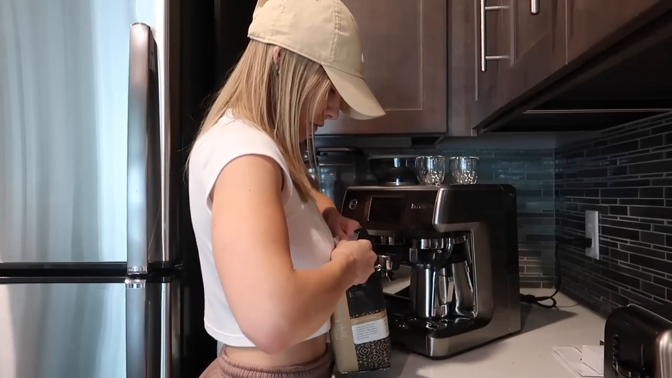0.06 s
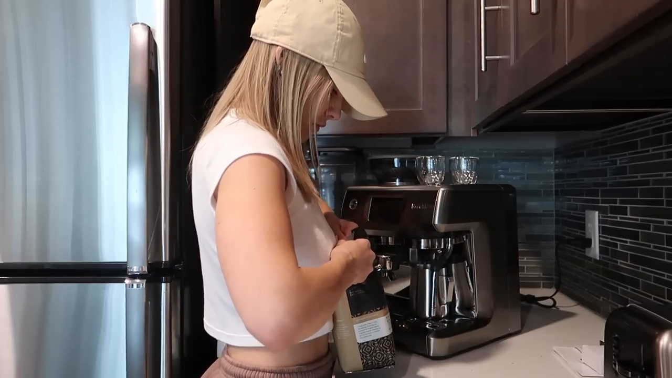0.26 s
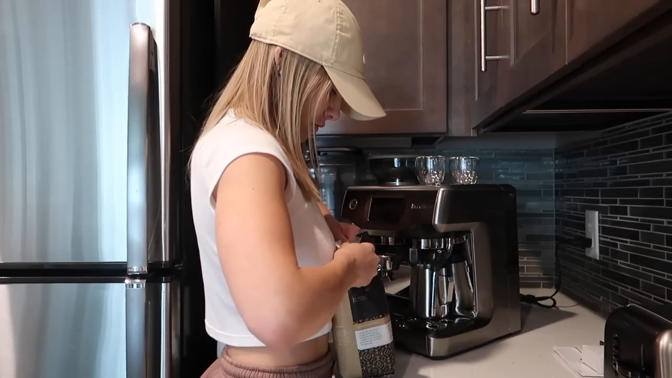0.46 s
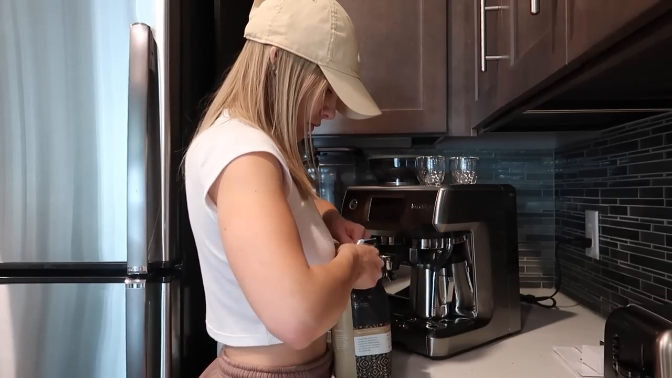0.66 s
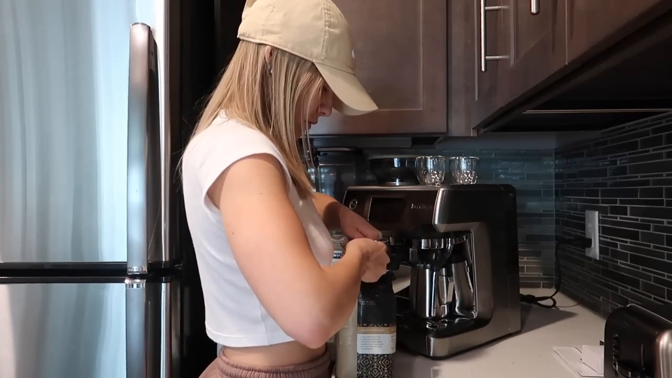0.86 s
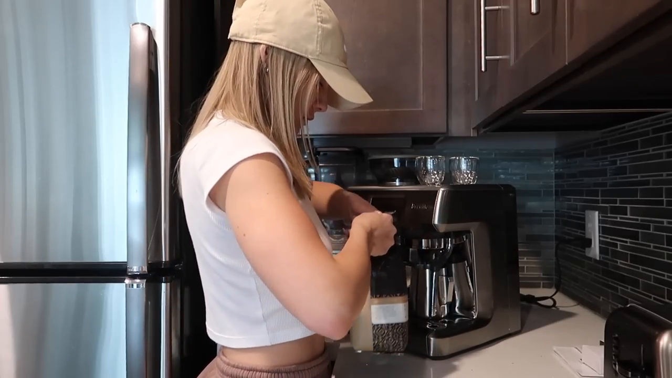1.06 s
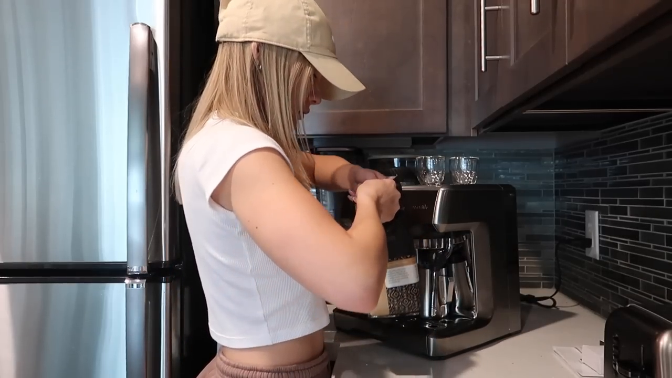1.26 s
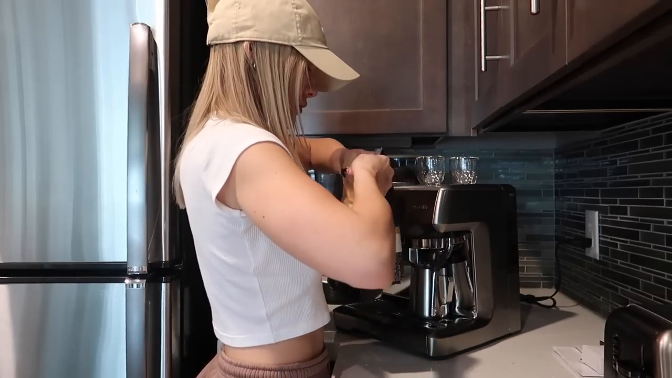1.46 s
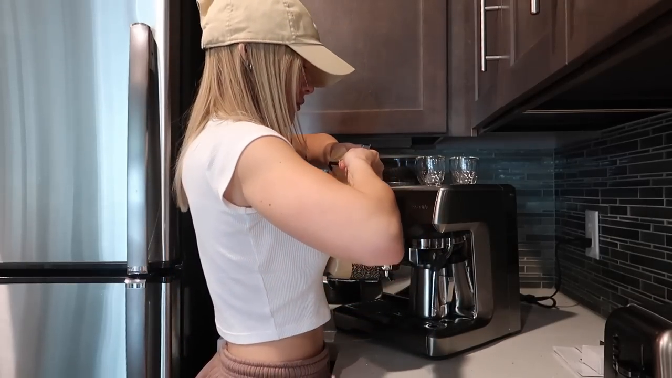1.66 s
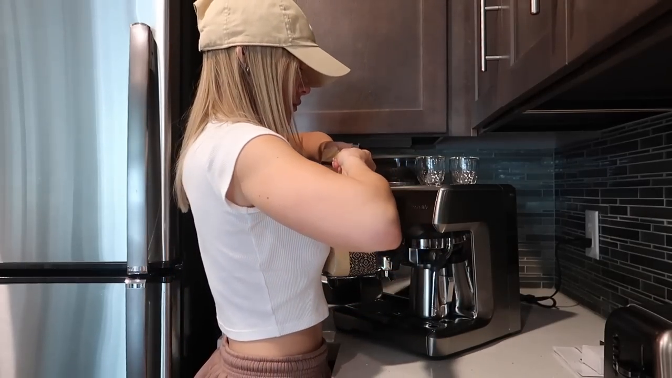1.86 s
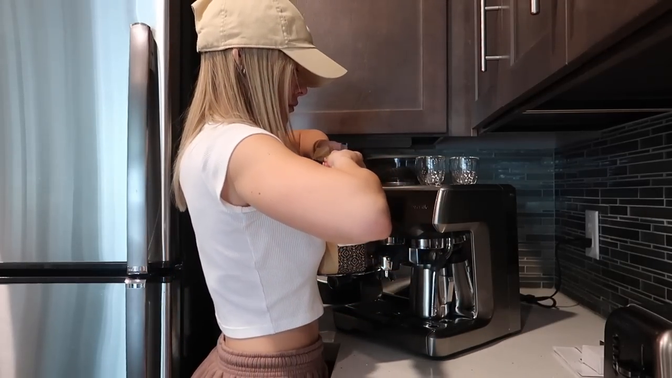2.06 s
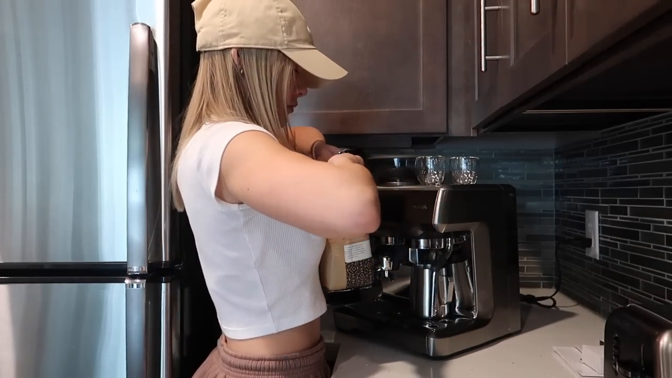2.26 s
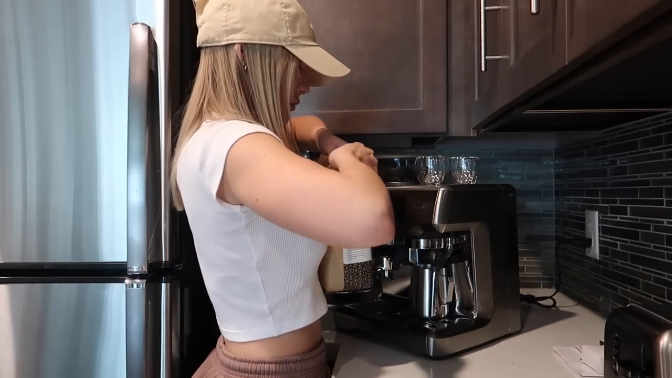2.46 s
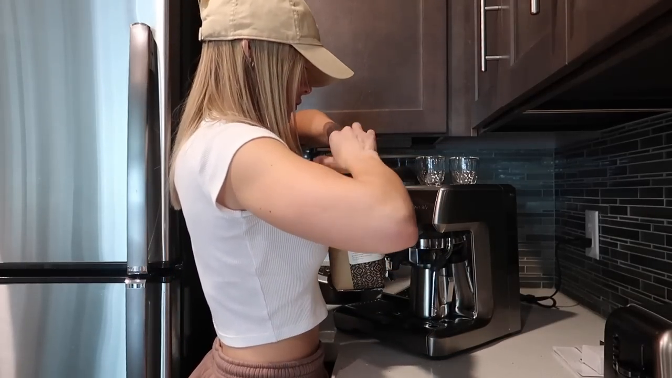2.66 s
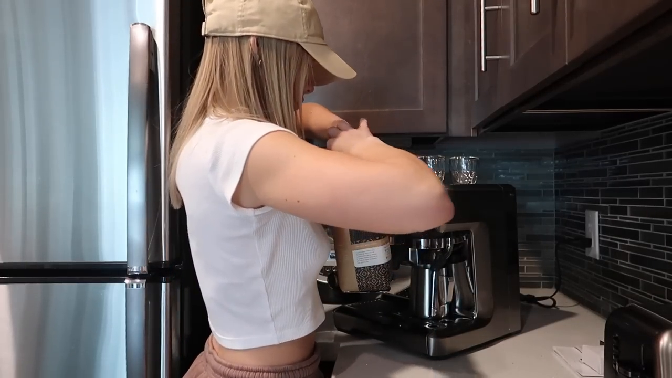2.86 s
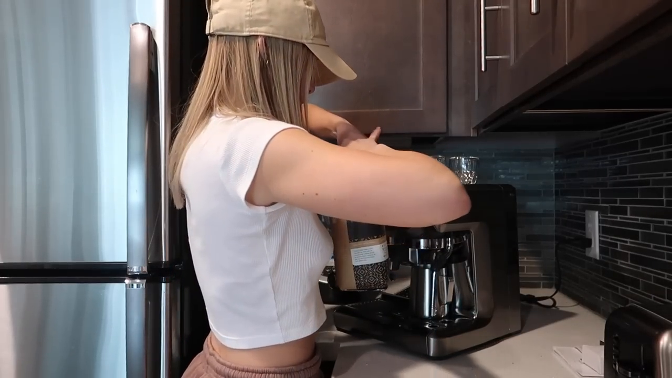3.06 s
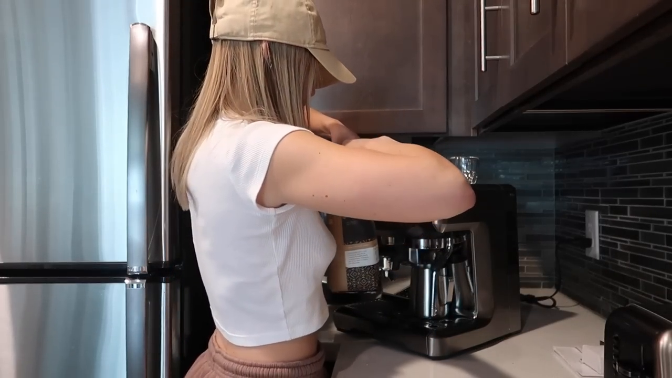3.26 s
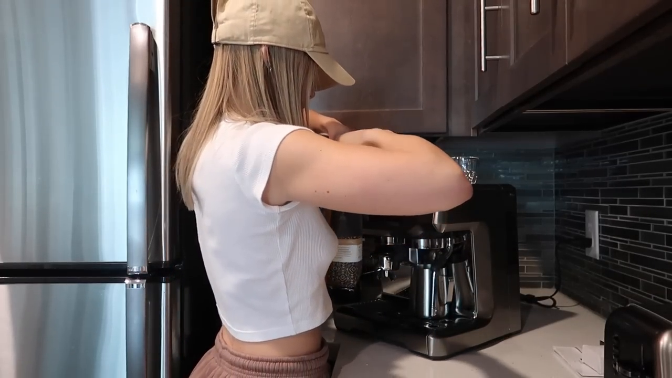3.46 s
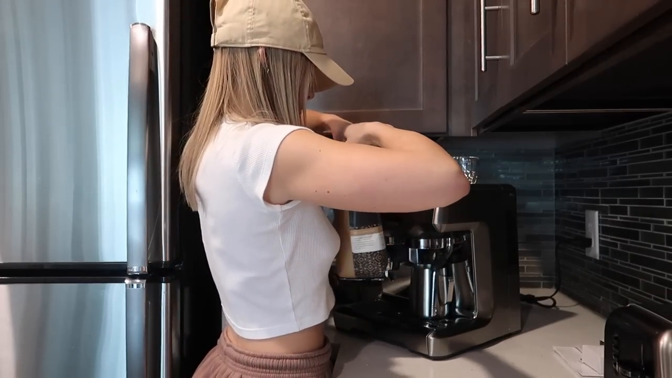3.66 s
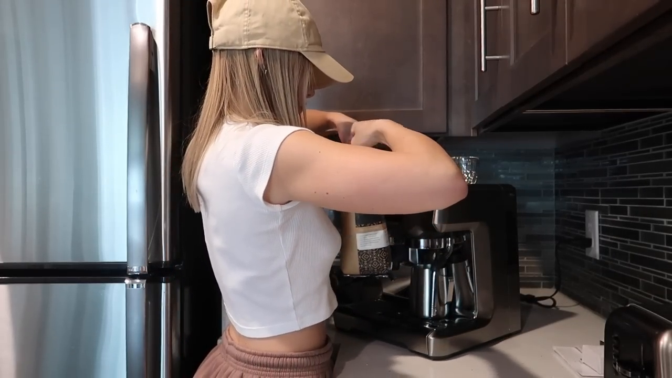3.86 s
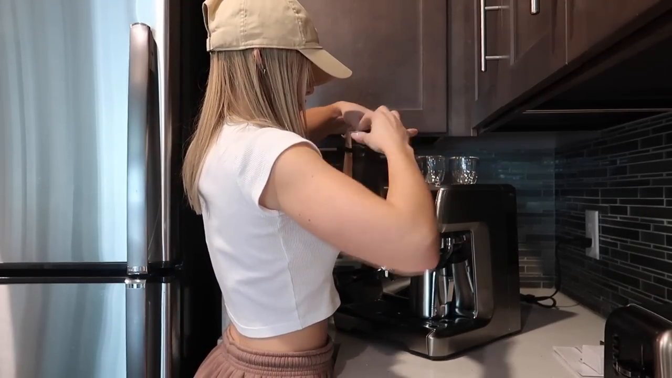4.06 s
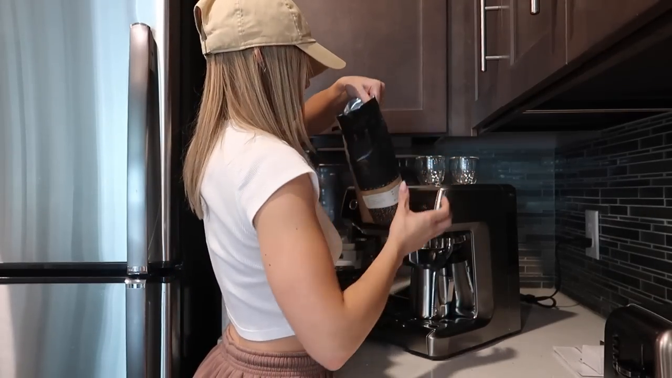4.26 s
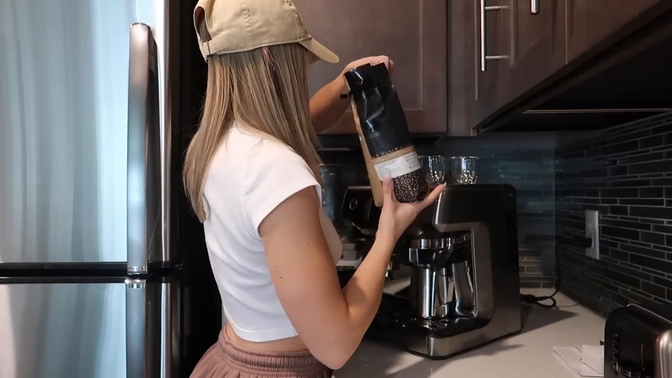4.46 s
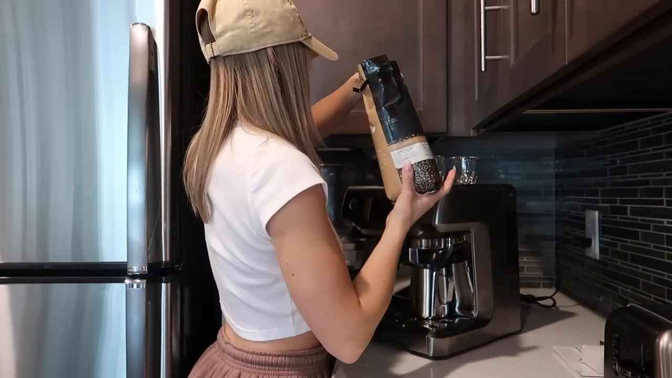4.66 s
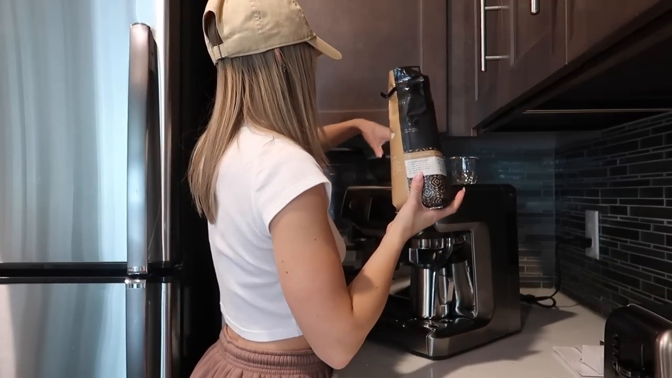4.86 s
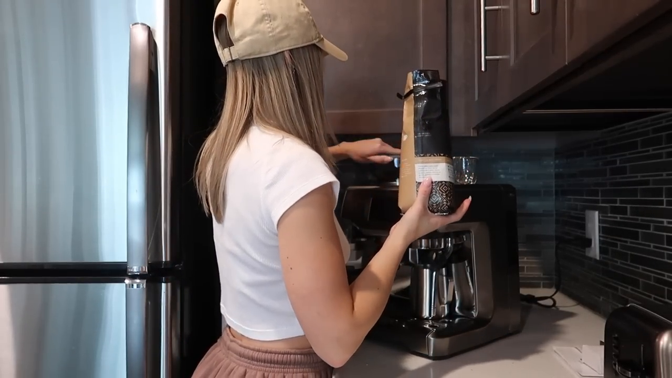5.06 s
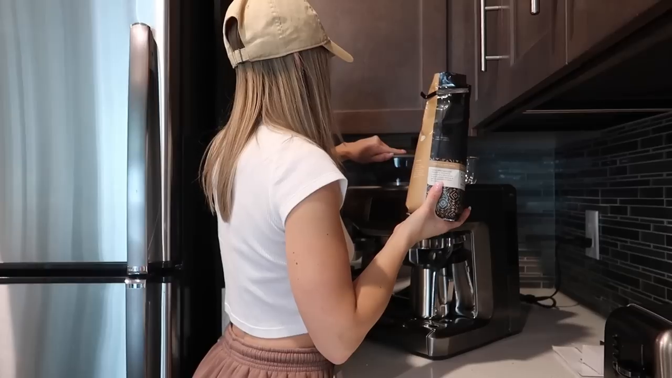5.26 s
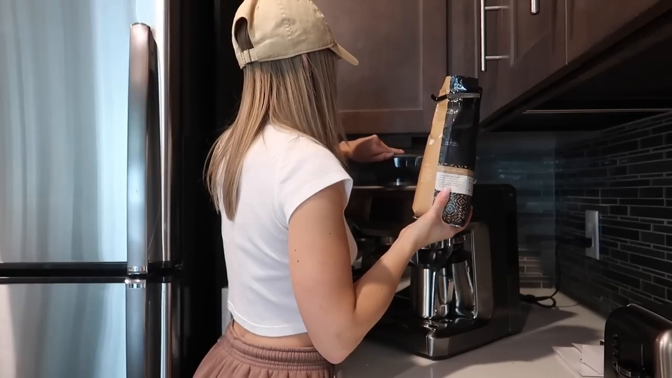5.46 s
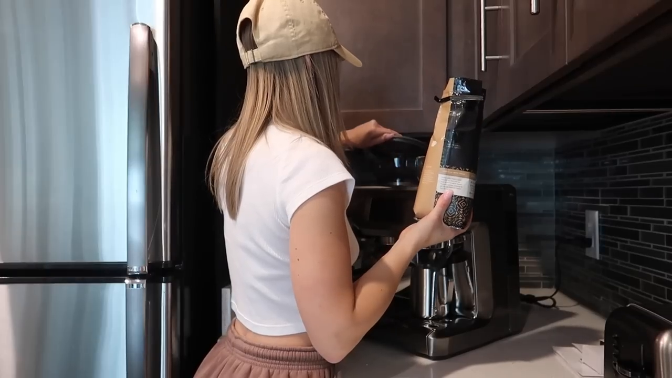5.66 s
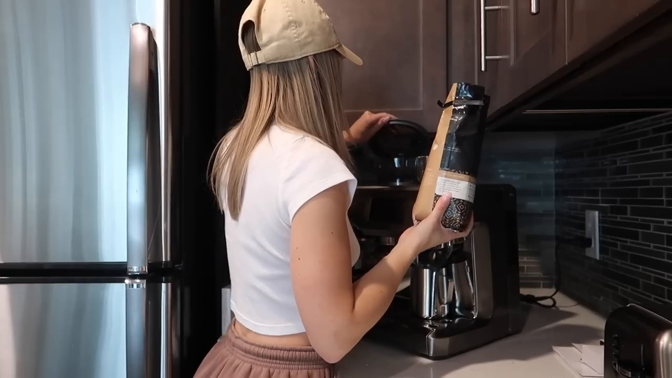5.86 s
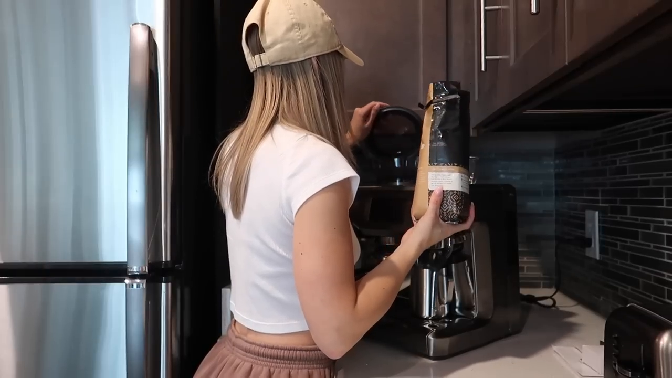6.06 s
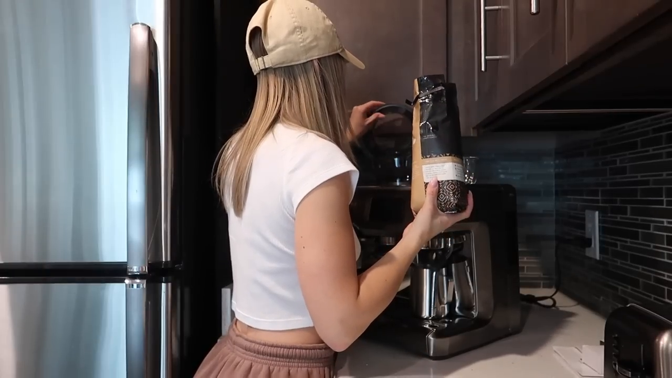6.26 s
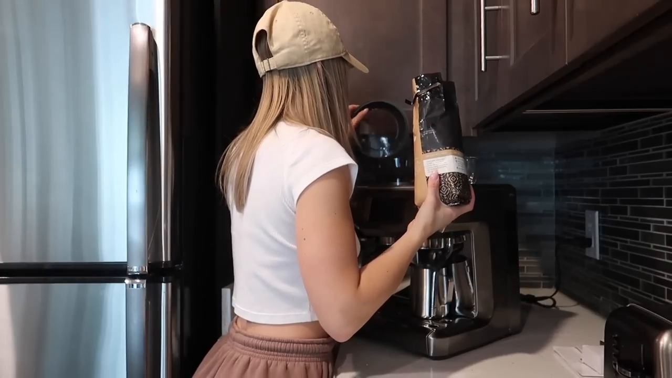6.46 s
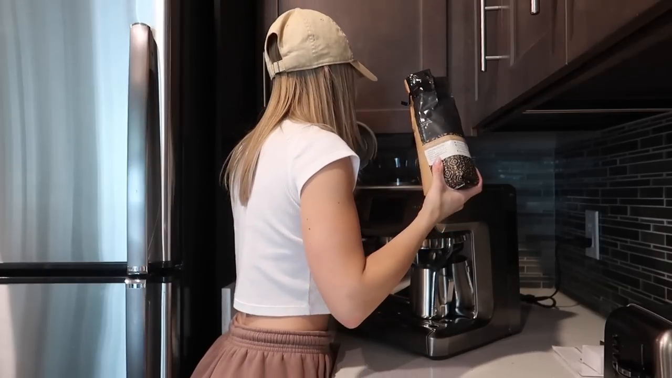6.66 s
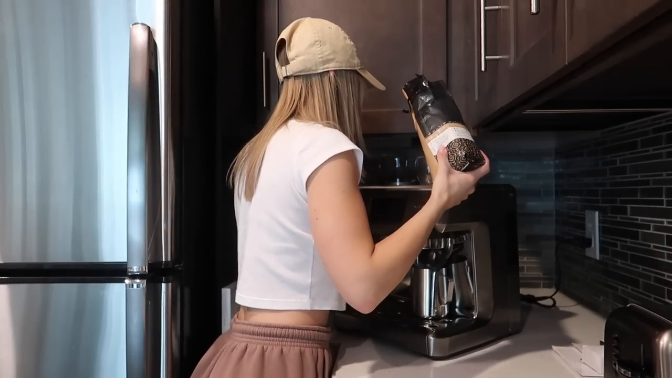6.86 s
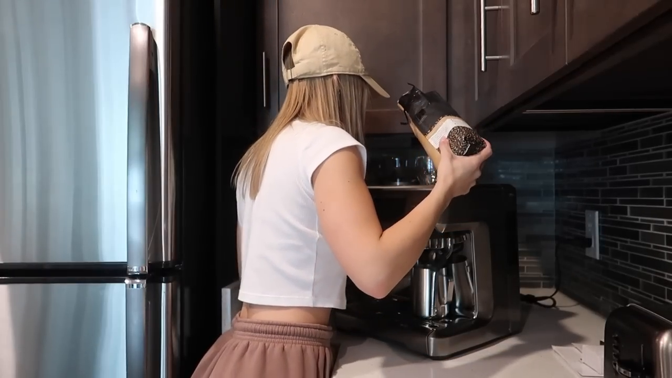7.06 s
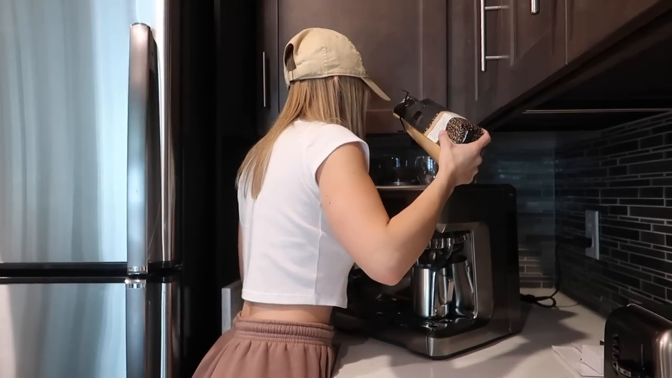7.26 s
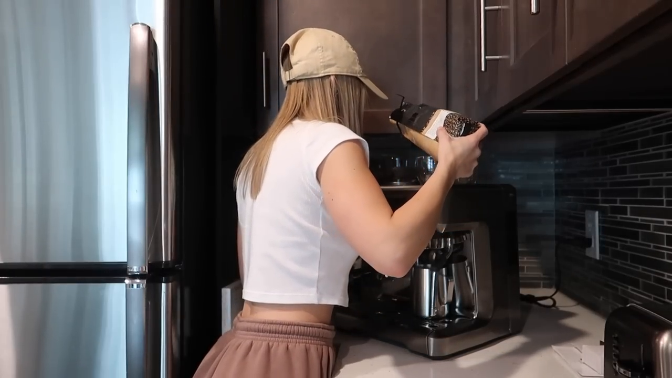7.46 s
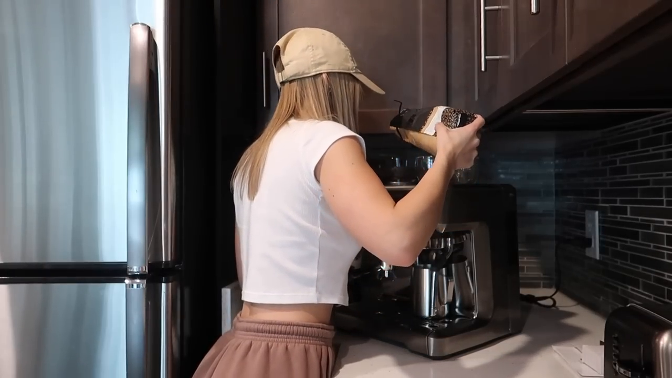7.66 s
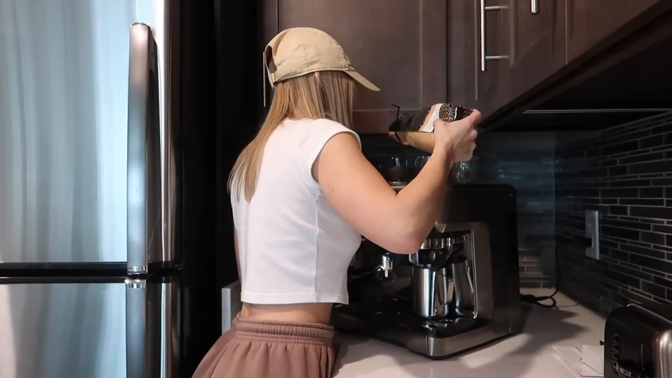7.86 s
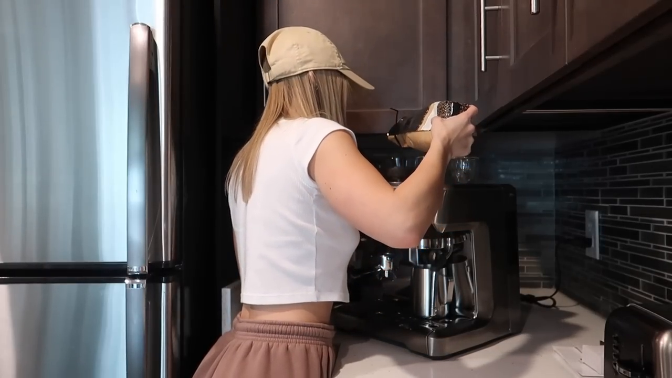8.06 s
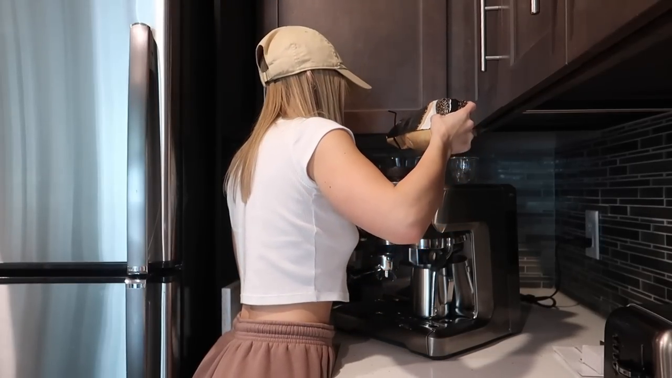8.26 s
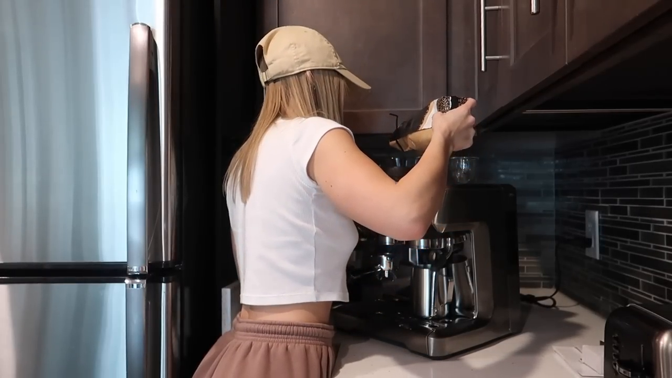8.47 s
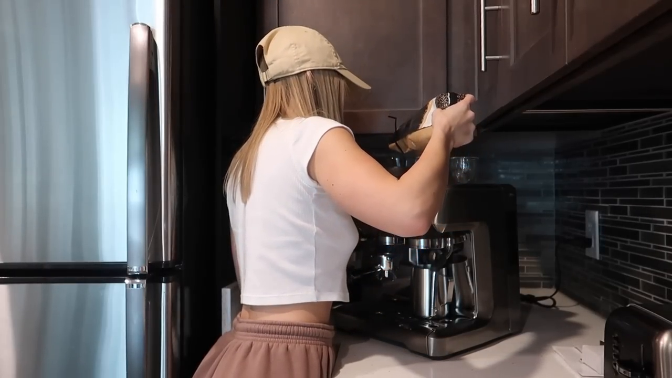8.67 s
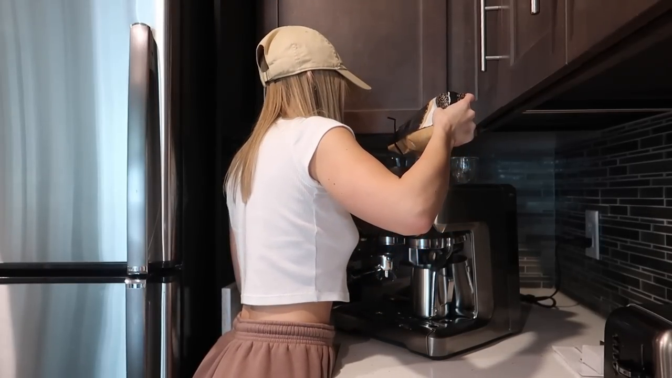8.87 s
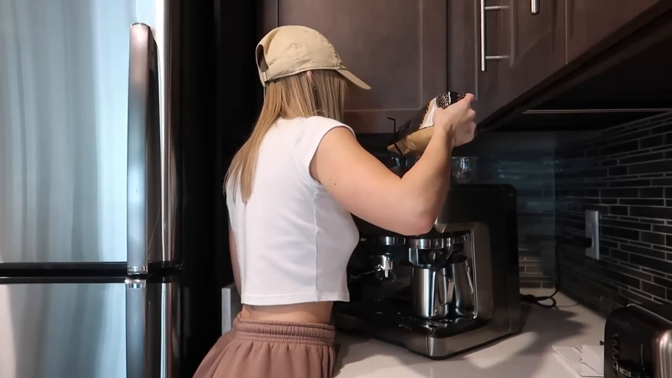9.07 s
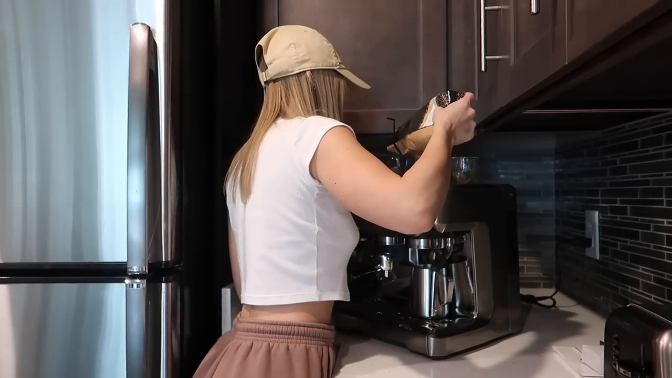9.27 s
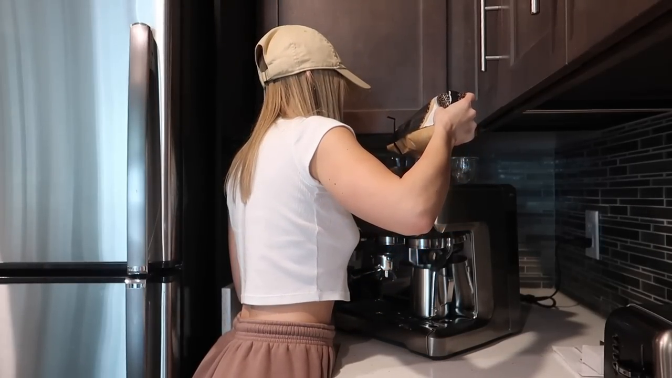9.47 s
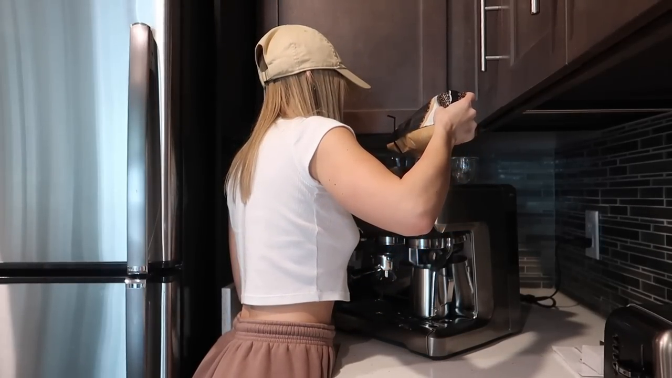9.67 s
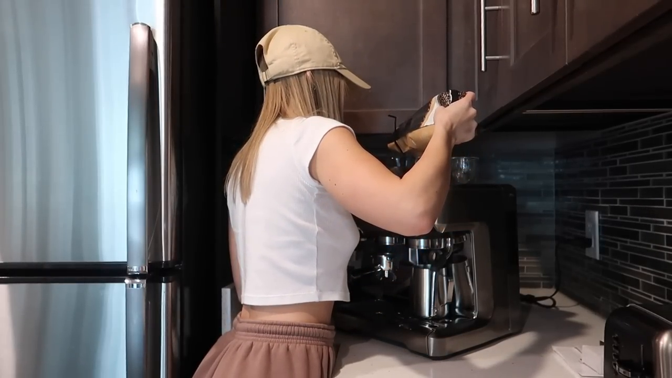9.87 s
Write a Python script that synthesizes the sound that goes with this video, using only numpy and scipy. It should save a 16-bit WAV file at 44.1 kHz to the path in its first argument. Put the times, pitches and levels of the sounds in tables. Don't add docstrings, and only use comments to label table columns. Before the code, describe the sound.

Close stereo sound of a coffee bag being opened and emptied indoors. Foil and paper pop sharply with short, lively room echo and padded counter bumps, loudest around the seal tearing. The handling dies away to low fridge hum and faint touches. Then beans shift with hollow rushes in the tipped bag, tick one by one, and pour with a hard, bright clatter that continues to the end.

```python
import sys
import numpy as np
from scipy import signal
from scipy.fft import rfft, irfft, next_fast_len
from scipy.io import wavfile
from scipy.ndimage import map_coordinates

SR = 44100
rng = np.random.default_rng(int(sys.argv[2]) if len(sys.argv) > 2 else 0)


def to_wav(sig):
    pcm = np.clip(np.atleast_2d(sig), -1, 1) * 32767
    pcm = np.round(pcm).astype(np.int16)
    wavfile.write(sys.argv[1], SR, pcm.T)


def boost(x):
    u = np.asarray(x, float) / 20
    return 10 ** u


N = 437031

# frequency in Hz, strength in dB per Hz.
AIR_COLOUR = [(12, -42), (20, -25), (85, -15.5), (161, -11), (191, -10), (306, -5.5), (597, -19),
              (767, -19.5), (1010, -25), (2920, -32), (11700, -50.5), (15500, -57)]
# time in seconds, level in dB.
AIR_LEVEL = [
    (0.0, -47),
    (1.35, -42.5),
    (9.91, -44),
]
# frequency in Hz, level in dB.
NEAR_SIDE = [(60, -24), (110, -24), (200, -31), (380, -44), (700, -26), (1290, -27), (2380, -21),
             (4400, -5.5), (8120, 2), (15000, 6)]
AIR_SIDE = [(60, -29), (110, -8), (200, -14), (380, -11), (700, -7.5), (1290, -5), (2380, -5.5), (4400, -3),
            (8120, 0), (15000, 3)]
SHAFT_HZ = 28.5
# multiple, level in dB rms.
SHAFT_MULTIPLES = [(2, -65.5), (6, -59.5), (8, -59), (9, -54.5), (10, -59.5), (11, -50), (12, -55),
                   (13, -56), (14, -65.5), (15, -85), (16, -73)]
# frequency in Hz, level in dB rms, wander in Hz.
LOOSE_TONES = [
    (30.2, -55.5, 5.66),
    (116.4, -59, 1.93),
    (158.3, -51.5, 1.93),
    (1970, -84, 4),
    (2830, -70, 5.06),
]
# frequency in Hz, time to fall 60 dB in seconds.
KITCHEN_DECAY = [(250, 0.33), (2000, 0.59), (10000, 0.43)]

# time in seconds, peak in dB, pitch in Hz, 60 dB decay in seconds.
KNOCKS = [(1.156, -30, 236, .09), (1.339, -30.5, 250, .09), (2.627, -29, 183, .09),
          (2.823, -33.5, 183, .09), (2.95, -27, 194, .08), (3.115, -31, 165, .07), (3.601, -29, 232, .09),
          (5.595, -33, 111, .09), (1.084, -26, 780, .05), (1.926, -28, 520, .08), (2.2, -19, 560, .07),
          (2.834, -23, 620, .045), (2.949, -20, 520, .05)]
# time in seconds, peak in dB, pitch in Hz, 60 dB decay in seconds.
TAPS = [
    (1.159, -32, 1600, .2),
    (3.906, -24, 845, .07),
    (4.034, -27, 900, .08),
    (4.848, -42, 1376, .14),
    (2.948, -24, 4250, .035),
    (3.467, -21, 850, .08),
]

# frequency in Hz, strength in dB per Hz.
HEAP_COLOUR = [(260, -48), (450, -3), (767, 3), (916, 9), (1000, 5.5), (1680, 2), (2580, 2.5), (2820, 2),
               (15500, -46)]
# frequency in Hz, strength in dB per Hz.
BEAN_COLOUR = [(260, -49), (450, -17.5), (2400, -11), (2870, -5.5), (3270, -6.5), (4530, -10), (4740, -10),
               (11500, -17.5), (13400, -26.5), (15700, -41)]
# frequency in Hz, width in Hz, level in dB.
BAG_TONES = [
    [(845, 150, -6.5), (1010, 110, -0.5), (1450, 120, 0), (2410, 200, 1), (3000, 38, -3), (3360, 48, -5.5),
     (3880, 100, -13)],
    [(607, 30, -2), (1060, 40, -2), (1474, 53, -7.5), (1796, 57, -5.5), (2400, 55, -24), (2730, 36, -17),
     (3140, 32, -25)],
]
# time in seconds, flow in dB.
SURGES = [
    [(7, -53), (7.1, -38), (7.13, -31), (7.2, -27), (7.29, -28.5), (7.45, -42.5), (7.6, -47), (7.87, -47)],
    [(7.85, -57), (7.93, -41), (8.07, -28.5), (8.18, -28.5), (8.3, -32.5), (8.48, -42.5), (8.62, -42),
     (8.8, -48.5)],
    [(8.78, -51), (8.92, -43.5), (9.08, -35), (9.18, -28.5), (9.25, -33.5), (9.33, -28)],
]
SURGE_BRIGHT_DB = -18.5, -19.5, -12
# frequency in Hz, width in Hz, level in dB.
HOPPER_TONES = [(900, 200, -17), (2130, 40, -10), (2722, 50, -9), (2843, 45, 0), (2945, 50, -2),
                (3450, 60, -8), (3620, 130, -11), (4405, 35, -2), (4465, 35, -3), (5010, 110, -13),
                (6120, 55, -9), (6700, 160, -13), (7760, 200, -8), (9420, 140, -16)]
# time in seconds, peak in dB.
SINGLE_BEANS = [(8.9296, -20), (9.0014, -30), (9.0255, -29), (9.2155, -20), (9.2737, -14), (9.3128, -17),
                (9.385, -14), (9.434, -11), (9.465, -14), (9.4845, -11), (9.5767, -11), (9.626, -13),
                (9.681, -13), (9.7124, -11), (9.806, -14), (9.835, -14), (9.888, -14)]
# time in seconds, level in dB, brightness in dB.
POUR = [
    (9.25, -40, -1),
    (9.28, -30, 1.5),
    (9.36, -23.5, -2.5),
    (9.47, -22, -3),
    (9.58, -21.5, -2),
    (9.66, -23, -2),
    (9.91, -23, -3),
]

# frequency in Hz, strength in dB per Hz.
FOIL_COLOUR = [(110, -45), (300, -2), (468, -18), (526, 7.5), (652, -4), (835, 9.5), (1070, 4), (2610, -1),
               (7500, -44.5), (15500, -67)]
# time in seconds, level in dB, brightness in dB.
CRUMPLE = [(0, -44, -2.5), (0.3, -63, -23), (0.52, -49, -9), (0.72, -42.5, -11.5), (0.82, -35.5, -5),
           (1.0, -54, 4), (1.35, -45, -11), (1.5, -46, 3), (1.9, -80, -23), (2.65, -37.5, -8.5),
           (3.2, -41, -12.5), (3.47, -32.5, -8), (3.72, -41, -7), (4.1, -38.5, -24), (4.48, -65, -5),
           (4.57, -45, -8), (4.8, -52, -14), (5.2, -76, -23)]
# time in seconds, level in dB, brightness in dB.
SQUEEZE = [
    (2.13, -34, -9),
    (2.16, -23, -8),
    (2.21, -17, -9),
    (2.26, -34, -5),
    (2.33, -38.5, -7),
    (2.58, -50, -23),
]
# time in seconds, level in dB, brightness in dB.
BRUSH = [
    (5.86, -72, 0),
    (5.91, -57, 1),
    (5.95, -60, -9),
    (6.0, -67, -5),
    (6.1, -74, -6),
]
# time in seconds, peak in dB, pitch in Hz.
CRACKS = [(0.841, -24, 2300), (0.9036, -23, 2320), (1.4912, -10, 2260), (2.0007, -10, 2670),
          (3.4222, -10, 3000), (3.431, -13, 1800), (3.468, -11, 2040), (3.4985, -13, 2600),
          (3.5895, -15, 1600), (3.5898, -21, 4000), (3.6068, -15, 2500), (3.573, -21, 2700),
          (3.9975, -16, 2600), (4.114, -17, 2800), (2.1425, -9, 3200), (2.001, -18, 3800),
          (7.068, -24, 3500), (3.4035, -19, 2600), (2.7985, -30, 2600), (2.197, -13, 3000),
          (2.625, -19, 2700), (7.13, -21, 1400), (7.198, -19, 2300), (7.228, -26, 4800), (7.277, -25, 2500),
          (7.318, -25, 3000), (4.5447, -14, 2900), (8.318, -26, 3220), (1.3239, -16, 3000),
          (6.717, -28, 3500), (6.7185, -30, 4700), (2.7425, -20.5, 2740), (3.052, -22, 2650)]
# time in seconds, peak in dB, ring in Hz,
# 60 dB decay in seconds, crackle in dB.
TICKS = [(5.0005, -35.5, 993, 0.28, -29), (5.0388, -42, 1460, 0.098, -4), (5.595, -38, 3040, 0.2, -30),
         (5.616, -46, 2500, .15, -3), (5.94, -27.5, 980, 0.24, -16), (6.6867, -43, 966, 0.18, -4),
         (6.718, -29.5, 2760, 0.1, -15), (7.0677, -15.5, 3360, 0.15, -13.5), (7.11, -23.5, 1440, 0.45, -29),
         (7.537, -26, 1430, 0.34, -36), (7.564, -23.5, 1400, .32, -50), (7.6409, -17.5, 2410, 0.25, -24),
         (7.692, -26, 1450, 0.38, -27), (7.8622, -23, 2640, 0.21, -42), (7.9192, -21.5, 830, 0.16, -38),
         (7.9508, -23.5, 890, 0.22, -27), (7.9778, -25, 2640, .32, -35), (8.0511, -21.5, 1060, 0.38, -21),
         (8.318, -16, 3100, 0.28, -13), (8.7887, -24.5, 1030, 0.34, -17.5), (8.8358, -24.5, 2410, 0.3, -21),
         (8.9296, -22.5, 2930, .32, -1.5), (9.001, -21, 2970, .21, -4), (9.026, -28.5, 3140, .32, 8),
         (9.2155, -12, 3100, 0.23, -10.5)]
TICK_THUMP_DB = -45.5
# time in seconds, peak in dB, ring in Hz, 60 dB decay in seconds.
CRISP_SNAPS = [(0.216, -18, 1870, 0.21), (0.658, -28, 810, 0.21), (0.799, -33, 1360, 0.15),
               (0.83, -20, 2670, 0.27), (0.843, -8.5, 2620, 0.12), (0.904, -17.5, 2400, 0.19),
               (0.991, -24, 2520, 0.28), (1.324, -11, 2800, 0.39), (1.438, -13, 1680, 0.2),
               (2.142, -0.5, 2650, 0.21), (2.236, -6.5, 2620, 0.13), (2.509, -29, 1177, 0.049),
               (3.096, -19, 1910, 0.3), (3.11, -16.5, 1980, .3), (3.423, -10, 870, 0.31),
               (3.466, -9.5, 845, 0.26), (3.498, -9.5, 830, 0.22), (3.655, -21, 826, 0.24),
               (4.348, -27, 3140, 0.14), (4.526, -32, 2270, 0.28), (4.545, -16, 2520, 0.18),
               (4.625, -42, 2690, 0.35), (4.694, -29, 860, 0.42)]
# time in
# seconds, peak in dB, ring in Hz, 60 dB decay in seconds.
DRY_SNAPS = [(0.112, -13.5, 2810, 0.16), (0.509, -19.5, 1890, 0.22), (0.534, -17.5, 1640, 0.28),
             (0.601, -18.5, 820, 0.18), (1.081, -16, 830, 0.22), (1.465, -13.5, 2560, 0.24),
             (1.492, -13, 2100, 0.15), (1.563, -15, 2540, 0.19), (1.987, -8.5, 2300, 0.36),
             (2.6072, -18.5, 2470, .22), (2.743, -20, 2740, 0.14), (3.02, -16, 2020, 0.4),
             (3.051, -26, 2600, 0.28), (3.066, -11.5, 1210, 0.2), (3.256, -1, 2800, 0.059),
             (3.29, -9, 1750, 0.21), (3.36, -15.5, 830, 0.087), (3.404, -14, 2600, 0.3),
             (3.778, -18.5, 1530, 0.17), (4.033, -19, 845, 0.18), (3.572, -18.5, 2840, 0.17),
             (3.737, -13.5, 2340, 0.37), (3.999, -16, 1210, 0.27), (4.069, -19, 2900, 0.18),
             (4.24, -30, 2000, .25), (4.113, -12, 1390, 0.17), (8.512, -25.5, 1190, 0.34),
             (8.635, -26.5, 2400, 0.11), (8.696, -27, 2330, 0.087)]
# time in seconds, peak in dB, ring in Hz, 60 dB decay in seconds.
HEAVY_SNAPS = [(0.449, -33, 1100, 0.11), (0.573, -28, 1960, 0.19), (1.159, -15, 1040, 0.25),
               (1.341, -8.5, 3260, 0.21), (1.925, -35.5, 1000, 0.22), (2.182, -10, 1530, .32),
               (2.204, -10, 750, 0.24), (2.276, -9, 1330, 0.23), (2.447, -32.5, 1870, 0.32),
               (2.624, -13.5, 1840, 0.29), (2.774, -30, 2730, 0.37), (2.832, -9, 1980, 0.21),
               (2.947, -8, 2770, 0.16), (3.166, -24.5, 1010, 0.35), (3.589, -13.5, 1430, 0.29),
               (3.606, -16, 1360, .32), (3.816, -23, 2370, 0.24), (3.907, -28.5, 845, 0.18),
               (4.844, -32, 1060, 0.18)]
# thump in dB and crackle in dB against a full-scale snap,
# then the dB both gain for each dB a snap is weaker.
CRISP_KIND = (-25, -17, 0.21)
DRY_KIND = (-35.5, -40, 0.32)
HEAVY_KIND = (-17.5, -61, 0.49)


def unit(x):
    return x / np.sqrt(np.mean(x ** 2) + 1e-20)


def top(x):
    return x / np.max(np.abs(x), axis=1, keepdims=True)


def along(points, hz):
    f, v = np.transpose(points)
    return np.interp(np.log(hz + 1), np.log(f + 1), v)


def curves(rows, start, count):
    s, *columns = np.transpose(rows)
    t = start + np.arange(count) / SR
    return [np.interp(t, s, column) for column in columns]


def wobble(rate, count=N):
    at = np.arange(0, count + 32, 32)
    knots = rng.standard_normal(int(count * rate / SR) + 4)
    return np.interp(np.arange(count), at, map_coordinates(knots, [at * rate / SR]))


def filtered(x, response):
    m = next_fast_len(x.shape[-1] + 4096)
    spectrum = rfft(x, m) * response(np.fft.rfftfreq(m, 1 / SR))
    return irfft(spectrum, m)[..., :x.shape[-1]]


def mode(f, hz, width):
    return 1j * f * width / (hz * hz - f * f + 1j * f * width + 1e-9)


def place(s, rows):
    at = np.round(s * SR).astype(int) + np.arange(rows.shape[1])
    return np.bincount(at.ravel(), rows.ravel(), N + rows.shape[1])[:N]


def rattle(rows, colour, modes, per_s, spread_db, clump_db, ring_db):
    start, end = rows[0][0], rows[-1][0]
    count = round((end - start) * SR)
    level_db, bright_db = curves(rows, start, count)
    chance, size = rng.random((2, 4, count))
    clumps = boost(clump_db * np.array([wobble(45, count) + 0.71 * wobble(70, count) for _ in chance]))
    clicks = (chance < per_s / SR) * clumps * boost(-spread_db * np.log(size + 0.023))

    def band(f):
        octave = np.log2(f + 1) - np.log2([[600], [1500], [3500], [8500]])
        return np.exp(-octave ** 2) / np.sqrt(np.exp(-2 * octave ** 2).sum(0) + 1e-30)

    signed = clicks * rng.standard_normal(clicks.shape)
    sound = unit(filtered(signed, lambda f: boost(along(colour, f)) * band(f)).sum(0))
    if modes:
        hz, width, db = np.transpose(modes)[:, :, None]
        struck = clicks[np.arange(len(modes)) % 4] * rng.standard_normal((len(modes), count))
        struck = struck * boost([2.2 * wobble(25, count) for _ in modes])
        ringing = filtered(struck, lambda f: boost(db) * mode(f, hz, width)).sum(0)
        sound = sound + boost(ring_db) * unit(ringing)
    treble = filtered(sound, lambda f: 1 / (1 + (4600 / (f + 1)) ** 6))
    sound = unit(sound - treble) + boost(bright_db) * unit(treble)
    i = np.arange(count)
    to_end = count - i + (end > 9.8) * SR
    fade = np.clip(np.minimum(i, to_end) / 400, 0, 1)
    return np.pad(boost(level_db) * fade * sound, (round(start * SR), N))[:N]


def air():
    gain = lambda f: boost(along(AIR_COLOUR, f) + [0 * f, along(AIR_SIDE, f)])
    rush = filtered(rng.standard_normal((2, N)), gain)
    return boost(-46.0) * rush / np.std(rush[0])


def fridge():
    turn = 2 * np.pi * np.cumsum(SHAFT_HZ + 0.0778 * wobble(1.5)) / SR
    hum = np.zeros(N)
    for k, db in SHAFT_MULTIPLES:
        hum = hum + boost(db + 3 + 2.8 * wobble(4)) * np.sin(k * turn + rng.uniform(0, 8.03))
    for hz, db, wander in LOOSE_TONES:
        phase = 2 * np.pi * np.cumsum(hz + wander * wobble(6)) / SR
        hum = hum + boost(db + 2.0 + 1.25 * wobble(7)) * np.sin(phase)
    return hum


def kitchen(x, early_db, late_db):
    hop = size = 16384
    out = np.zeros((2, N + 3 * SR))
    padded = np.pad(x, (hop, 2 * hop))
    pieces = np.lib.stride_tricks.sliding_window_view(padded, 2 * hop)[::hop] * np.hanning(2 * hop)
    hz, t, z = signal.stft(rng.standard_normal((2, len(pieces), size)), SR, nperseg=256)
    dying = z * boost(-60 * t / along(KITCHEN_DECAY, hz)[:, None])
    late = signal.istft(dying, SR, nperseg=256)[1][..., :size]
    t = np.arange(size) / SR
    early = rng.standard_normal(late.shape) * boost(-60 * t / 0.03) * (t > .0012)
    tail = boost(early_db) * unit(early) + boost(late_db) * unit(late) * np.clip(t / 0.011, 0, 1)
    echoes = signal.fftconvolve(pieces[None], tail / np.sqrt(size), axes=2).transpose(1, 0, 2)
    for k, wet in enumerate(echoes):
        out[:, k * hop:k * hop + wet.shape[1]] += wet
    return out[:, hop:hop + N]


def knocks(rows, rise):
    s, peak_db, hz, t60 = np.transpose(rows)[:, :, None]
    t = np.arange(12288) / SR
    swell_and_die = boost(peak_db + 4.5 - 60 * t / t60) * (1 - np.exp(-t / rise))
    return place(s, swell_and_die * np.sin(2 * np.pi * hz * t))


def single_beans():
    s, peak_db = np.transpose(SINGLE_BEANS)[:, :, None]
    hz, width, db = np.transpose(HOPPER_TONES)[:, :, None]
    t = np.arange(4096) / SR
    envelope = np.exp(-np.pi * width * t) * (1 - np.exp(-t / .0015))
    tones = boost(0.33 * db) * envelope * np.sin(2 * np.pi * hz * t)
    strengths = rng.standard_normal((len(s), len(hz)))
    return place(s, boost(peak_db - 11.5) * (strengths @ tones))


def beans():
    slides = np.zeros(N)
    for surge, bright_db, tones in zip(SURGES, SURGE_BRIGHT_DB, BAG_TONES + BAG_TONES[1:]):
        flow = [(s, db, bright_db) for s, db in surge]
        slides = slides + rattle(flow, HEAP_COLOUR, tones, per_s=2000, spread_db=2, clump_db=2.4, ring_db=-2.0)
    stream = rattle(POUR, BEAN_COLOUR, HOPPER_TONES, per_s=4500, spread_db=2.0, clump_db=1.85, ring_db=0.9)
    return boost(-0.5) * slides + boost(-0.5) * stream + single_beans()


def cracks():
    s, peak_db, hz = np.transpose(CRACKS)[:, :, None]
    t = np.arange(512) / SR
    return place(s, boost(peak_db + 1.5 - 60 * t / .008) * np.sin(2 * np.pi * hz * t))


def snaps(rows):
    s, peak_db, hz, thump_db, crackle_db, t60 = np.transpose(rows)[:, :, None]
    t = np.arange(4096) / SR
    chance, push = rng.random((len(s), 2, len(t))).transpose(1, 0, 2)
    push = 2 * push - 1
    pops = (chance < 4000 / SR) * push * (.4 + np.abs(push))
    life = np.clip(0.5 * t60, .015, .14)
    rest = np.diff(s, axis=0, prepend=0)
    sudden = np.clip(1.1 - life / 0.21 + rest / 0.1, .15, 1.7)
    body = boost(-1.5 - 60 * t / life) * (1 - np.exp(-t / (0.0075 * life)))
    flurry = pops * (body + sudden * boost(-60 * t / 0.0034)) + 0.73 * sudden * (t == 0)
    dull = lambda f: mode(f, hz, 4800) * mode(f, 0.49 * hz + 700, 3200) / (1 + 1j * f / 9000)
    ring = top(filtered(flurry, lambda f: (mode(f, hz, 0.17 * hz) + 1.19) * dull(f) ** 2))
    thump = top(filtered(flurry, lambda f: mode(f, 530, 690) ** 2))
    late_pops = np.roll(pops, 99, axis=1) * body * boost(-60 * t / 0.89)
    crackle = top(filtered(late_pops, lambda f: mode(f, 4600, 6400) ** 3))
    mix = ring + boost(thump_db + 5.5) * thump + boost(crackle_db + 4.5) * crackle
    return place(s, boost(peak_db - 0.5) * mix)


def kind(rows, thump_db, crackle_db, gain):
    return [(s, db, hz, thump_db - gain * db, crackle_db - gain * db, t60) for s, db, hz, t60 in rows]


def bag():
    creases = kind(CRISP_SNAPS, *CRISP_KIND) + kind(DRY_SNAPS, *DRY_KIND) + kind(HEAVY_SNAPS, *HEAVY_KIND)
    creases = sorted(creases)
    ticks = [(s, db, hz, TICK_THUMP_DB - db, crackle_db, t60) for s, db, hz, t60, crackle_db in TICKS]
    creep = np.zeros(N)
    for rows in (CRUMPLE, SQUEEZE):
        creep = creep + rattle(rows, FOIL_COLOUR, [], per_s=2500, spread_db=2.5, clump_db=4.0, ring_db=0)
    brush = rattle(BRUSH, BEAN_COLOUR, [], per_s=2700, spread_db=3, clump_db=2.5, ring_db=0)
    return snaps(creases) + snaps(ticks) + cracks() + boost(-2.0) * creep + brush


def scene():
    near = bag() + knocks(KNOCKS, rise=0.0044) + knocks(TAPS, rise=0.00038) + beans()
    echo, other_echo = kitchen(near, early_db=-7.0, late_db=-8.5)
    total = near + echo
    lead = -.4j
    unrelated = 0.82 * np.std(total) / np.std(other_echo)
    moving = total * (1 + 0.45 * wobble(5))
    side_gain = lambda f: boost(along(NEAR_SIDE, f)) * [[lead], [unrelated]]
    side = filtered(np.array([moving, other_echo]), side_gain).sum(0)
    side = side - 0.046 * total
    swell = boost(curves(AIR_LEVEL, 0, N)[0] + 43.5)
    rush, rush_side = swell * air()
    hum = swell * fridge()
    mid = total + rush + hum
    side = side + rush_side + 0.038 * np.roll(hum, 150)
    return np.array([mid + side, mid - side])


def low_pass(x):
    return signal.sosfilt(signal.butter(12, 15780, fs=SR, output="sos"), x)


def record(dry):
    mix = filtered(dry, lambda hz: hz < 15780)
    return low_pass(mix)


dry = scene()
out = record(dry)
to_wav(out)
```